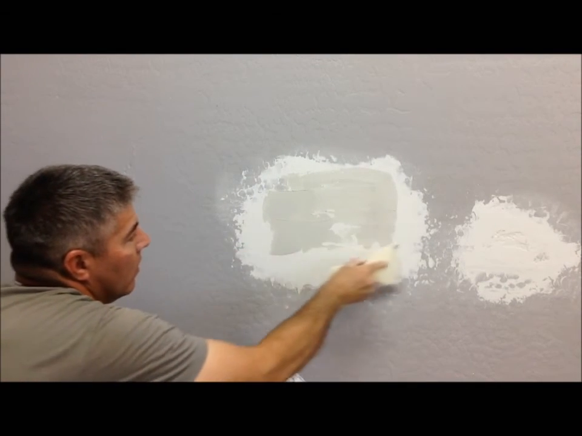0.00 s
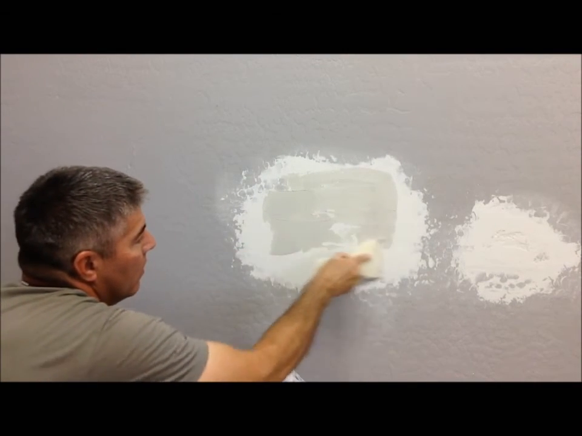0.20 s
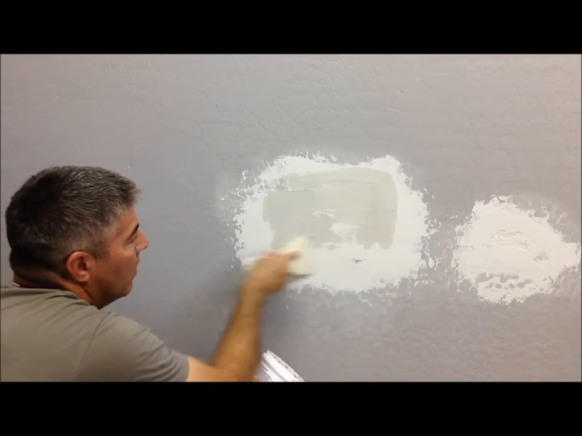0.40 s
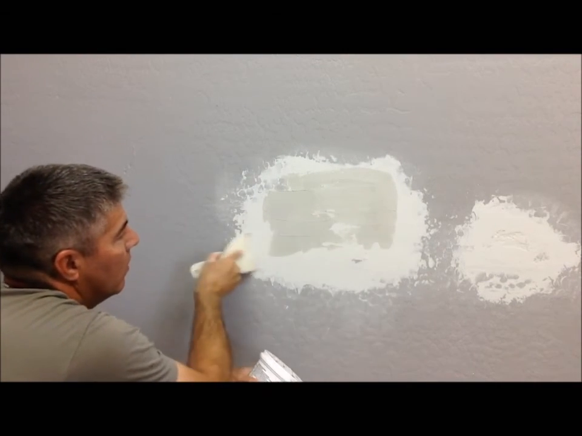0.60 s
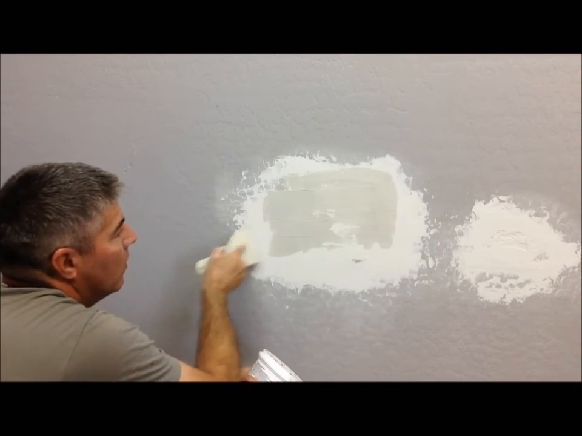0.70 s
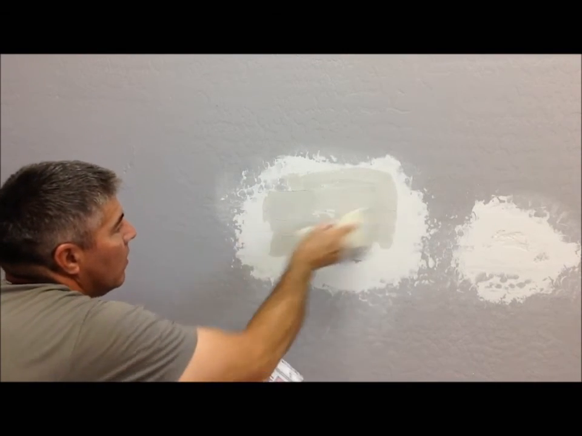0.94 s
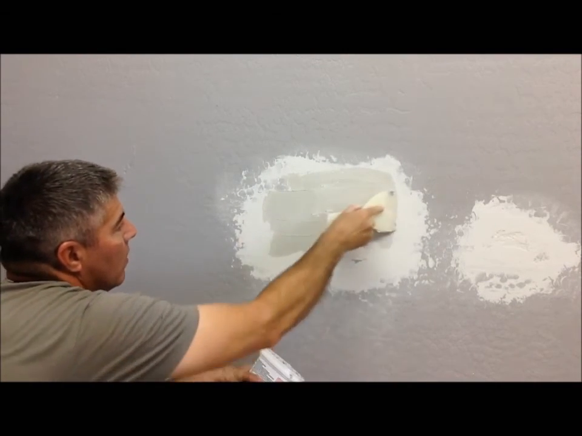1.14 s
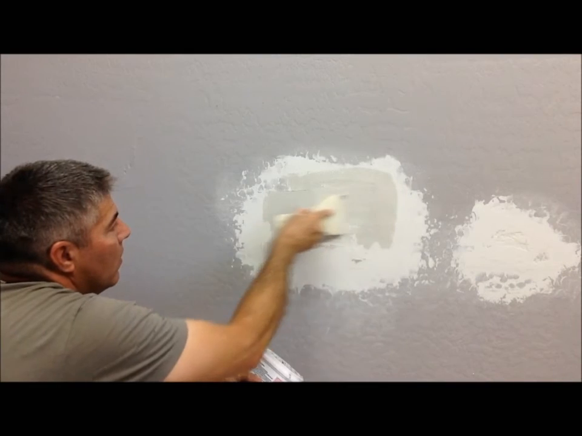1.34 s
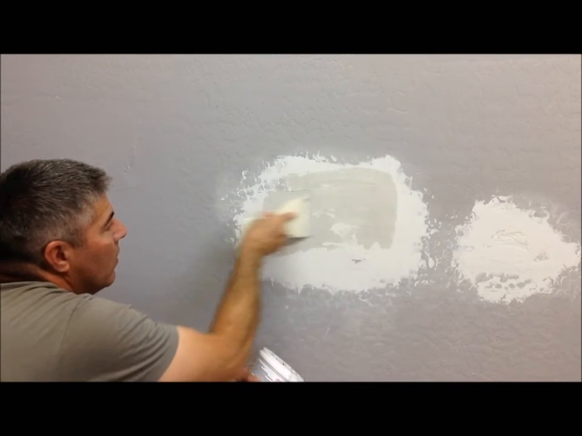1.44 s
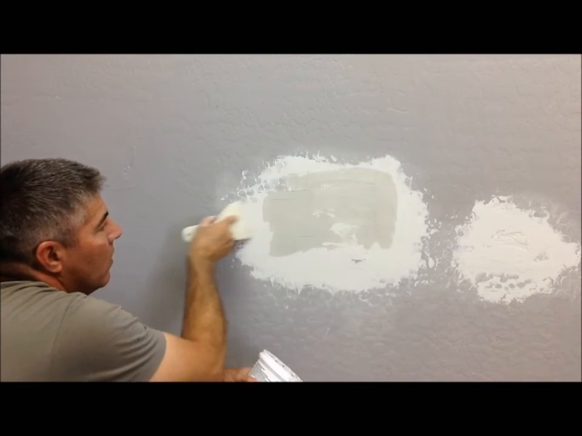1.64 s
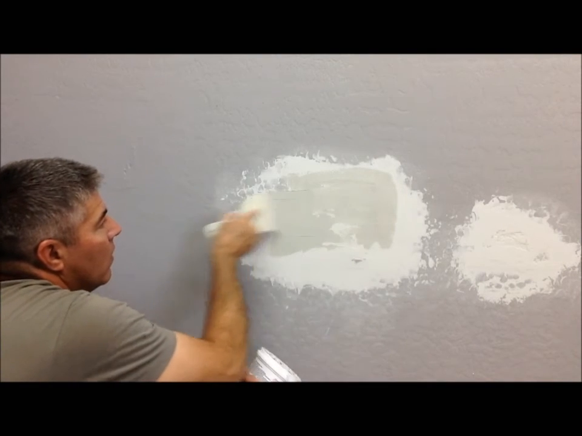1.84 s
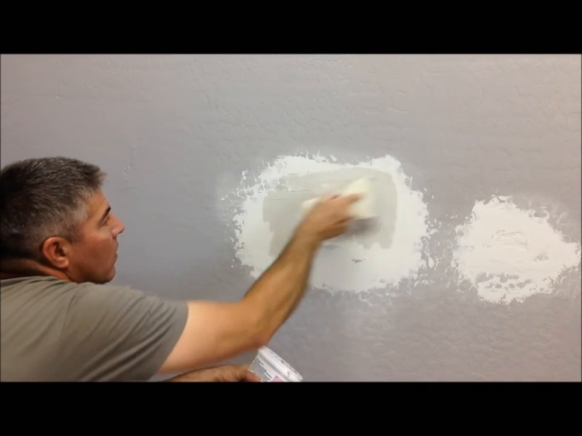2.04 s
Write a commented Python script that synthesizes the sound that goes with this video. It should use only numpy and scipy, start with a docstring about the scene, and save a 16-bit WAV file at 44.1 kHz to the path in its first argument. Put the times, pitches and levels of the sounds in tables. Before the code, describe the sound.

A plastic putty knife scrapes wet compound across a wall in two gritty strokes, echoing indoors

```python
"""Putty knife on a wall, bare room

A plastic putty knife lands on a wall and drags wet compound across it, twice, in a bare, echoing room.
Grit slipping under the edge rings the blade and hisses; the wall board hums under the pressure.
Each landing is a tick, a knock and a boom of the board; short thin tones sound here and there.
One microphone, near enough that the direct knife outweighs its echo, over a soft room tone.
The sound dips briefly now and then, while the short thin tones stay at full level."""
import sys
import numpy as np
from scipy import signal
from scipy.io import wavfile
from scipy.ndimage import uniform_filter1d

SR = 44100
rng = np.random.default_rng(int(sys.argv[2]) if len(sys.argv) > 2 else 0)


def wav_out(sig):
    """Save sig, one row per channel (or a flat mono array), as 16-bit PCM at SR to the path in sys.argv[1]."""
    wavfile.write(sys.argv[1], SR, np.round(np.clip(np.atleast_2d(sig).T, -1, 1) * 32767).astype(np.int16))


N = 92610  # samples

# Loudness of each layer along the two strokes, before the room:
# time_s, low_ring_db, high_ring_db, hiss_db, hum_db, rasp_db
STROKE_LEVELS = [
    [(.195, -60.5, -67, -73, -78, -65), (.23, -48.5, -53, -55.5, -57.5, -68),
     (.28, -49, -46, -39.5, -63.5, -62.5), (.33, -44.5, -48, -40, -64, -65),
     (.38, -49, -49, -46.5, -65.5, -65), (.45, -47, -42.5, -39.5, -60.5, -65),
     (.52, -45.5, -50.5, -42, -73, -63), (.58, -53, -51, -46.5, -66, -60), (.63, -41.5, -42, -45, -68, -70),
     (.667, -42.5, -44.5, -39.5, -82, -56.5), (.71, -41, -46.5, -47, -63.5, -59.5),
     (.78, -70, -74, -64, -80, -63)],
    [(1.207, -58.5, -65, -70, -64, -58), (1.25, -60.5, -74, -64.5, -57.5, -62.5),
     (1.3, -59.5, -60, -61.5, -77, -73), (1.35, -59, -60, -54.5, -62, -73),
     (1.39, -57, -59.5, -56.5, -67.5, -79), (1.47, -44, -44.5, -45, -67.5, -56),
     (1.52, -55, -57.5, -49.5, -70, -69.5), (1.58, -68, -70, -61.5, -71, -68.5),
     (1.63, -76, -63, -64, -79, -83), (1.662, -60, -62, -63, -85, -75), (1.667, -49, -52.5, -54, -75, -71),
     (1.685, -43, -44.5, -43, -75, -61), (1.72, -42, -45.5, -44, -83, -64.5),
     (1.77, -45.5, -49, -48.5, -66, -58), (1.81, -55, -72, -63, -81, -91),
     (1.86, -68, -63, -82, -86, -70.5), (1.96, -73, -82, -91, -72, -64.5)],
]
# The knife meets the wall: start_s, tick_db, thud_db, boom_pitch_hz, boom_db
LANDING_EVENTS = [(.204, -37, -43, 114.6, -45), (1.207, -38, -55, 140, -53)]
# Short thin tones, many of them inside the dips: centre_s, length_s, pitch_hz, level_db
TONE_EVENTS = [(.445, .03, 2750, -49), (0.448, 0.026, 4300, -57), (.51, 0.031, 1778, -48),
               (.625, .05, 4450, -54), (0.632, .04, 1810, -49), (0.657, 0.037, 4004, -49),
               (.695, 0.058, 2395, -47.5), (0.702, 0.044, 3150, -48.5), (0.703, .035, 3390, -50),
               (1.704, 0.055, 1412, -49.5), (1.713, .05, 1640, -51), (1.707, 0.034, 2604, -47.5),
               (1.701, .035, 3277, -47.5), (1.70, 0.027, 4320, -55), (1.76, .04, 3500, -50),
               (1.76, .05, 2620, -49), (1.79, 0.064, 2900, -52), (1.82, .05, 2520, -54),
               (1.82, .04, 1750, -56), (1.92, .05, 1700, -60), (1.9, .06, 2650, -59),
               (1.82, 0.043, 4670, -57), (1.83, .035, 5400, -60), (1.92, .03, 4620, -62),
               (.63, .04, 3110, -52), (1.94, .06, 818, -65.5)]
# Broad blade resonances: pitch_hz, width_hz, level_db
BLADE_MODES = [(1430, 287, -6.5), (1833, 350, -4), (2477, 520, 1), (3430, 2150, 8.5), (4340, 2780, 7.5)]
# Narrow blade modes that catch now and then: pitch_hz, level_db
SQUEAK_MODES = [(1410, -4.5), (1640, 0.5), (1800, -5.5), (2330, -3), (2620, -0.5), (2870, -4), (3270, 4),
                (3600, 4.5), (4000, 5.5), (4340, 2), (4650, -7.5)]
# Low wall board resonances: pitch_hz, width_hz, level_db
HUM_MODES = [(119.5, 134, -6), (345, 132, -1.5)]
# Upper wall board resonances: pitch_hz, width_hz, level_db
RASP_MODES = [(645, 264, 4), (836, 277, 2)]
# Colour of the hiss under the edge: pitch_hz, level_db
HISS_SPECTRUM = [(590, -104), (1000, -29.5), (1770, -41), (2180, -59), (2800, -36), (2900, -6),
                 (4330, 15.5), (15400, 8)]
# Modes of the landing tick: pitch_hz, width_hz, level_db
TICK_MODES = [(1820, 280, 1), (895, 250, -7), (3000, 800, -5)]
# Board modes of the landing thud: pitch_hz, level_db, t60_s
THUD_MODES = [(330, -3.5, 0.25), (592, -8, 0.14), (939, -10, 0.18), (1033, -2.5, 0.1)]
# Echo decay of the bare room: pitch_hz, t60_s
ROOM_DECAY = [(200, 0.59), (1000, 0.86), (2500, 0.74), (5000, 0.65), (9000, 0.52), (12000, 0.32),
              (15000, 0.42)]
# Colour of the room tone: pitch_hz, level_db
AIR_SPECTRUM = [(20, -21), (36, -6.5), (55, -9), (101, -6), (203, -12.5), (233, -17.5), (281, -9),
                (1370, -21.5), (1700, -23), (2170, -26.5), (15400, -42)]
# Brief dips, positive values counting as 0: centre_s, length_s, whole_db, extra_bass_db, extra_treble_db
DIP_EVENTS = [(0.033, 0.047, 1, -7.5, -7), (0.099, 0.058, -5.5, 0, -7.5), (0.158, 0.037, -7, -2, -4),
              (0.209, 0.018, 14, 1.5, -20), (0.352, .02, -6.5, -5.5, -1), (0.628, 0.025, -5, -15, -8.5),
              (0.697, 0.021, -5, -17.5, -11.5), (1.247, 0.025, -1.5, -6.5, -11),
              (1.488, 0.032, 0, -12, -9.5), (1.557, 0.02, -1.5, -12, -3.5), (1.639, 0.024, -1, -14, -11),
              (1.707, 0.018, -5, -14, -8), (1.823, 0.032, -9, -22, -12), (1.922, 0.025, -4, -1, -7.5),
              (1.986, 0.035, -3, -1, -17)]

GRIT_PER_S, GRIT_SPREAD_DB = 12000, 2.5  # mean rate of slips; scale of their random sizes
CHATTER_DB, PATCH_DB = 1.5, 1.5  # rms stutter of the edge; rms unevenness of the hiss
TOUCH_S, LIFT_S = 0.0032, 0.0079  # fades as the knife meets and leaves the wall
SPLIT_HZ = 3200  # blade modes above this pitch follow the high ring
BEND, FLEX = 0.053, 0.025  # rms pitch drift of broad modes, of squeaks as the blade flexes (share)
SQUEAK_DB, SQUEAK_WIDTH_HZ = -11.5, 72
SQUEAK_FLICKER_DB, SQUEAKS_PER_S = 5, 60  # flicker scale; its fastest rate
TONE_WIDTH_HZ, TONE_ROOM_DB = 28, -13  # width; send to the room
TICK_RISE_S, THUD_RISE_S, BOOM_T60_S = 0.00025, 0.013, 0.2
SNAP_DB = -15  # click at the head of the tick
DIRECT_DB, ROOM_DB, FIRST_ECHO_S = 0.5, -6, 0.004  # knife heard directly; its send to the room; gap
AIR_DB = -68
DIP_BASS_HZ, DIP_TREBLE_HZ = 1140, 4840  # corners of the extra bass and treble cuts
EDGE_HZ = 15450  # top of the recorded band


def scrape():
    """Grit rings the blade broadly and in brief squeaks, hisses directly and hums in the wall board."""
    slips = grit() * amp(CHATTER_DB * wander(per_s=90))
    ring = np.zeros((2, N))  # low and high blade modes
    for k, (hz, width, db) in enumerate(BLADE_MODES):
        sign = (-1) ** k  # neighbouring modes alternate in sign
        pitch = hz * (1 + BEND * wander(per_s=10))
        ring[int(hz > SPLIT_HZ)] += sign * amp(db) * ringing(slips, pitch, width)
    for hz, db in SQUEAK_MODES:
        flicker_db = SQUEAK_FLICKER_DB * np.clip(wander(per_s=SQUEAKS_PER_S), -3, 1.5)
        pitch = hz * (1 + FLEX * wander(per_s=12))
        squeak = ringing(slips, pitch, SQUEAK_WIDTH_HZ)
        ring[int(hz > SPLIT_HZ)] += amp(SQUEAK_DB + db + flicker_db) * squeak
    hiss = coloured(grit(), HISS_SPECTRUM, PATCH_DB)
    hum = board(slips, HUM_MODES)
    rasp = board(slips, RASP_MODES)
    layers = unit(ring[0]), unit(ring[1]), hiss, hum, rasp
    return sum(contact(k + 1) * layer for k, layer in enumerate(layers))


def grit():
    """Tiny slips of the edge over grains, of random sign and size."""
    size_db = GRIT_SPREAD_DB * np.minimum(rng.exponential(1, N), 5)
    size = amp(size_db) * rng.choice([-1., 1.], N)
    return unit(size * (rng.random(N) < GRIT_PER_S / SR))


def board(slips, modes):
    """The wall board's resonances summed, driven by the slips."""
    return unit(sum(amp(db) * ringing(slips, hz, width) for hz, width, db in modes))


def contact(column):
    """Gain of one stroke column over time; silent while the knife is off the wall."""
    t, gain = np.arange(N) / SR, np.zeros(N)
    for stroke in STROKE_LEVELS:
        rows = np.array(stroke)
        touch = (t - rows[0, 0]) / TOUCH_S
        lift = (rows[-1, 0] - t) / LIFT_S
        on_wall = np.clip(np.minimum(touch, lift), 0, 1)
        gain += on_wall * amp(np.interp(t, rows[:, 0], rows[:, column]))
    return gain


def landings():
    """A short plastic tick with a soft knock and boom of the board: decaying sines."""
    out, t = np.zeros(N), np.arange(SR // 3) / SR
    tick = sum(amp(db) * np.exp(-np.pi * width * t) * sine(hz, t) for hz, width, db in TICK_MODES)
    tick *= 1 - np.exp(-t / TICK_RISE_S)
    tick[:4] += amp(SNAP_DB) * np.array([1, 1, -1, -1])
    board_rise = 1 - np.exp(-t / THUD_RISE_S)
    thud = board_rise * sum(amp(db - 60 * t / t60) * sine(hz, t) for hz, db, t60 in THUD_MODES)
    for start, tick_db, thud_db, boom_hz, boom_db in LANDING_EVENTS:
        boom = board_rise * amp(boom_db - 60 * t / BOOM_T60_S) * sine(boom_hz, t)
        out[round(start * SR):][:len(t)] += amp(tick_db) * tick + amp(thud_db) * thud + boom
    return out


def thin_tones():
    """Short thin tones made from narrow filtered noise, each swelling and fading."""
    out, noise = np.zeros(N), grit()  # dense random impulses serve as the noise
    for centre, length, hz, db in TONE_EVENTS:
        at = slice(round((centre - .12) * SR), round((centre + .12) * SR))
        t = np.arange(at.start, at.stop) / SR
        swell = np.exp(-(2 * (t - centre) / length) ** 2)
        out[at] += amp(db) * swell * ringing(noise[at], hz, TONE_WIDTH_HZ)
    return out


def room(x):
    """The bare room's echo: a dense noise tail that decays at its own rate at each pitch."""
    taps = rng.standard_normal(SR) * (np.arange(SR) / SR > FIRST_ECHO_S)
    hz, t, z = signal.stft(taps, SR, nperseg=256)
    decay = amp(-60 * t / read(ROOM_DECAY, hz)[:, None])
    tail = signal.istft(z * decay, SR, nperseg=256)[1]
    return signal.fftconvolve(x, tail / np.linalg.norm(tail))[:N]


def room_tone():
    """The quiet air of the room: coloured noise."""
    return amp(AIR_DB) * coloured(rng.standard_normal(N), AIR_SPECTRUM, patch_db=1.2, size=2048)


def dips(x):
    """Brief drops in level, usually with extra cuts in bass and treble."""
    hz, t, z = signal.stft(x, SR, nperseg=256, noverlap=192)
    bass = 1 / (1 + (hz / DIP_BASS_HZ) ** 8)
    treble = 1 / (1 + (DIP_TREBLE_HZ / (hz + 1)) ** 4)
    for centre, length, whole_db, bass_db, treble_db in DIP_EVENTS:
        depth_db = min(whole_db, 0) + min(bass_db, 0) * bass + min(treble_db, 0) * treble
        shape = np.exp(-(2 * (t - centre) / length) ** 4)
        z = z * amp(np.outer(depth_db, shape))
    return signal.istft(z, SR, nperseg=256, noverlap=192)[1][:N]


def amp(db):
    """Decibels to gain."""
    return 10 ** (np.asarray(db) / 20)


def unit(x):
    """Scales x to rms 1."""
    return x / np.sqrt(np.mean(x ** 2) + 1e-20)


def sine(hz, t):
    """A plain sine at times t."""
    return np.sin(2 * np.pi * hz * t)


def read(points, hz):
    """Reads a table between its points along log pitch."""
    f, value = np.transpose(points)
    return np.interp(np.log(hz + 1), np.log(f + 1), value)


def wander(per_s):
    """A random curve of rms 1 whose fastest swing is per_s cycles a second."""
    t = np.arange(N) / SR
    rates = np.geomspace(per_s / 10, per_s, 12)
    return unit(sum(np.sin(2 * np.pi * (f * t + rng.random())) / np.sqrt(f) for f in rates))


def resonate(x, hz, width):
    """A resonance of gain 1 that follows the curve hz: shift to 0 Hz, smooth, shift back."""
    turn = np.exp(2j * np.pi * np.cumsum(hz * np.ones(len(x))) / SR)
    r = np.exp(-np.pi * width / SR)
    smooth = signal.lfilter([1 - r], [1, -r], x / turn + 1e-18)
    return 2 * (turn * smooth).real


def ringing(x, hz, width):
    """A steep resonance from two passes, rms 1."""
    return unit(resonate(resonate(x, hz, width), hz, 2 * width))


def coloured(x, spectrum, patch_db, size=512):
    """Gives x a spectrum, with louder and softer patches drifting in time and pitch."""
    overlap = size - size // 4
    hz, t, z = signal.stft(x, SR, nperseg=size, noverlap=overlap)
    patches = uniform_filter1d(rng.standard_normal(z.shape), 5, 0)  # smooth along pitch
    patches = unit(uniform_filter1d(patches, 8, 1))  # then along time
    z = z * amp(read(spectrum, hz)[:, None] + patch_db * patches)
    return unit(signal.istft(z, SR, nperseg=size, noverlap=overlap)[1][:N])


def scene():
    """Knife, echo and room tone with dips, the direct thin tones undipped; same on both channels."""
    knife = scrape() + landings()
    tones = thin_tones()
    echo = room(amp(ROOM_DB) * knife + amp(TONE_ROOM_DB) * tones)
    mono = dips(amp(DIRECT_DB) * knife + echo + room_tone()) + tones
    return np.array([mono, mono])


def record(dry):
    """The microphone signal's band limit: a steep low-pass."""
    low_pass = signal.firwin(511, EDGE_HZ, window=("kaiser", 9), fs=SR)
    return signal.oaconvolve(dry, low_pass[None], "same")


dry = scene()
out = record(dry)
wav_out(out)
```